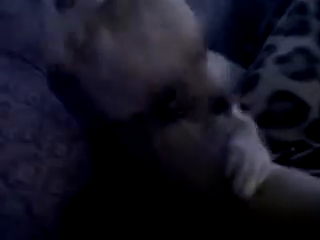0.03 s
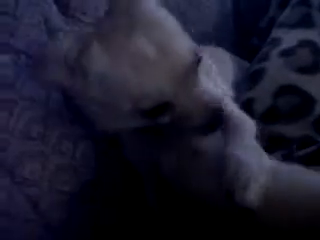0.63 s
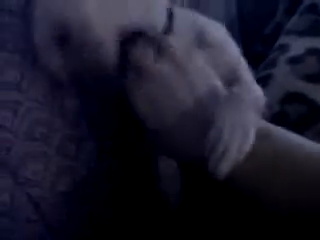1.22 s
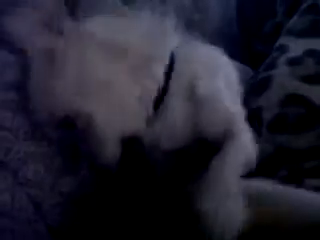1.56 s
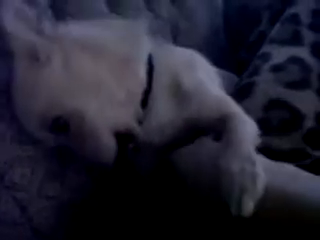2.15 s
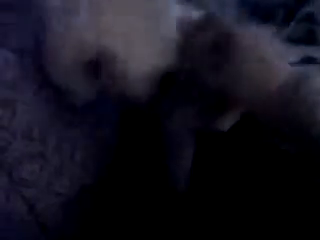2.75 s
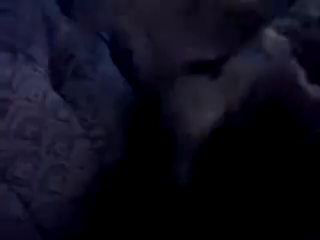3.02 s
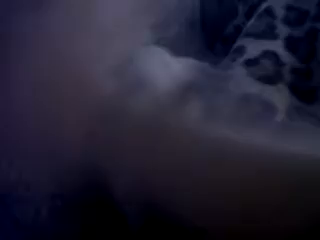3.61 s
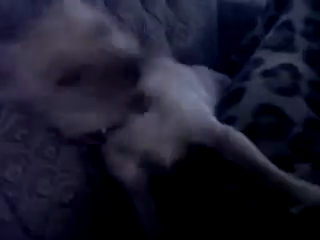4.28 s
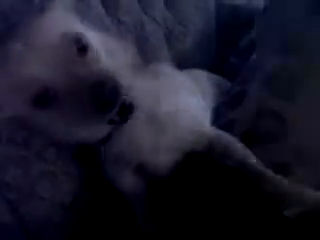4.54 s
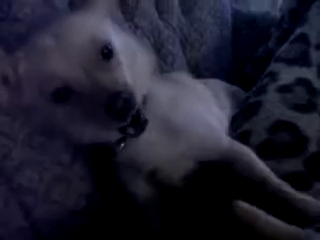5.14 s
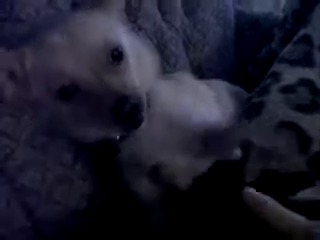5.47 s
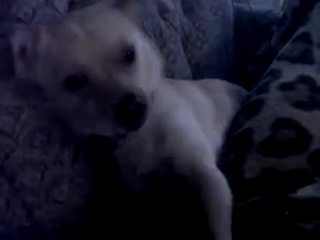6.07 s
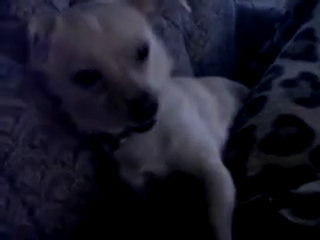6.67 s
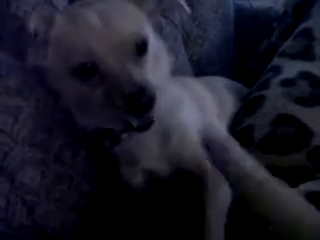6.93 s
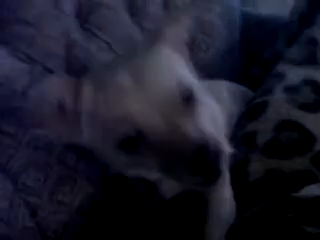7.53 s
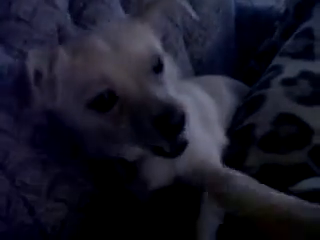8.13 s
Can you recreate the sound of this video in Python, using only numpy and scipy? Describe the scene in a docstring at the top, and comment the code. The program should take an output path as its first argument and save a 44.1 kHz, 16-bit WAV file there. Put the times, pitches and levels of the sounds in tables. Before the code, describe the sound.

A small puppy play-growls close to the microphone in a quiet, softly furnished room. A low growl is followed by a snarl that smooths into a moan, then a snort and a few soft grunts. More rough growls come in bursts, with quick gasps, lip smacks and a faint cloth rustle between them. Near the end, a slow rattle of grunts leads into the loudest snarl, and the cushions rustle faintly.

```python
"""A small puppy play-growls on a sofa, close to the microphone, in a quiet, softly furnished room.
It starts with a low growl: its vocal folds flap, and the pulses hum through the throat and, as the lips
part, blare from the mouth. Near 1 s a snarl smooths into a moan, then come a snort and a few grunts.
More growls follow from 2.5 s, with gasps, lip smacks and a rustle between them. Near 7 s a slow rattle
of grunts leads into the loudest snarl. Last, the puppy snatches air and shifts on the cushions."""
import sys
import numpy as np
from scipy import signal
from scipy.io import wavfile
from scipy.ndimage import uniform_filter1d

SR = 44100
rng = np.random.default_rng(int(sys.argv[2]) if len(sys.argv) > 2 else 0)


def int16_out(signal):
    """Quantize to a 16-bit WAV file."""
    q = np.round(np.clip(np.atleast_2d(signal).T, -1, 1) * 32767)
    wavfile.write(sys.argv[1], SR, q.astype(np.int16))


N = 369999

# hard slaps of the vocal folds at the height of a snarl: (time [s], peak [dB])
FOLD_SLAPS = [(.965, -19), (1.011, -16.5), (1.049, -17), (1.057, -16.5), (7.362, -14), (7.408, -7.7),
              (7.446, -5.7), (7.453, -6.5), (7.459, -7.5), (7.484, -4.8), (7.499, -8), (7.551, -10)]
# tone of the narrow throat: (frequency [Hz], level [dB])
NARROW_THROAT = [(40, -47), (75, -24.5), (102, -10), (145, -1), (180, -1.5), (230, 4), (300, -2.5),
                 (400, -6.3), (520, -5.3), (620, -13), (740, -26.5), (1100, -46), (2500, -78.5)]


def gain_of(db):
    """Turns decibels into a factor to multiply by."""
    return 10 ** (np.asarray(db) / 20)


def evened(x):
    """Scales the average strength (rms) to 1."""
    return x / np.sqrt(np.mean(x ** 2) + 1e-20)


def peaked(x):
    """Scales the highest peak to 1."""
    return x / (abs(x).max() + 1e-20)


def steadied(x, size=2600):
    """Holds the running strength near 1, leaving single pulses uneven."""
    window = np.hanning(size)
    weight = signal.fftconvolve(np.ones(len(x)), window, "same")
    power = signal.fftconvolve(x ** 2, window, "same") / weight
    return x / np.sqrt(abs(power) + 1e-4 * np.mean(x ** 2))


def wobble(count, size, mode="reflect"):
    """A random curve, smoothed over size samples."""
    return evened(uniform_filter1d(rng.standard_normal(count), size=size, mode=mode))


def read(points, hz):
    """Looks up a table at the frequencies hz, on a log scale."""
    f, value = np.transpose(points)
    return np.interp(np.log(hz + 1), np.log(f), value)


def follow(rows, t):
    """Looks up every column of a table at the times t."""
    s, *columns = np.transpose(rows)
    return [np.interp(t, s, c) for c in columns]


def add(mix, s, sound):
    """Mixes a sound in at s seconds."""
    part = mix[max(round(s * SR), 0):][:len(sound)]
    part += sound[:len(part)]


def swell(rise, hold, db, fade_db_per_s):
    """Loudness of a puff or a rub: it rises, holds and dies away by 40 dB."""
    t = np.arange(0, rise + hold + 40 / fade_db_per_s, 1 / SR)
    return np.minimum(t / rise, 1) * gain_of(db - fade_db_per_s * np.maximum(t - rise - hold, 0))


def colour(x, tone, size=4096):
    """Filters a sound to the given tone; each pulse rings after it strikes."""
    log_gain = np.log(gain_of(read(tone, abs(np.fft.fftfreq(size, 1 / SR)))))
    ring = np.fft.ifft(np.exp(np.conj(signal.hilbert(log_gain)))).real
    return signal.fftconvolve(x, ring[:size // 2])[:len(x)]


def cavity(x, hz, modes, order=3):
    """A hollow space rings at a few frequencies (its modes), which move together with hz."""
    out, turns = np.zeros(len(x)), np.cumsum(hz * np.ones(len(x))) / SR
    for k, (multiple, width, db) in enumerate(modes):
        turn = np.exp(2j * np.pi * multiple * turns)
        decay = np.exp(-np.pi * width / SR)
        ring = signal.lfilter([(1 - decay) ** order], np.poly([decay] * order), x / turn)
        out += (-1) ** k * gain_of(db) * (turn * ring).real
    return out


def grainy_hiss(events, tone, grain_db, fade_db_per_s):
    """Short bursts of hiss whose level flickers."""
    out = np.zeros(N)
    for s, rise, hold, db in events:
        level = swell(rise, hold, db, fade_db_per_s)
        hiss = rng.standard_normal(len(level)) * gain_of(grain_db * wobble(len(level), 150))
        add(out, s, level * evened(colour(hiss, tone)))
    return out


def still_air():
    """The faint, steady hush of the room."""
    # tone of the hush: (frequency [Hz], level [dB])
    hush = [(25, -9.5), (130, -5), (220, -9.5), (480, -11), (780, -7.5), (1000, -13.5), (1700, -19),
            (3000, -24.5), (4200, -29.5), (6000, -36), (8000, -43.5)]
    return gain_of(-66.5) * evened(colour(rng.standard_normal(N), hush))


def room_echo(x, size=22050):
    """Sound bounces off walls and furniture; the highest tones die first."""
    # how long the room rings: (frequency [Hz], time to fade by 60 dB [s])
    ring_times = [(100, 0.25), (500, 0.18), (1500, 0.23), (6000, 0.067)]
    bounces = rng.standard_normal(size) * (rng.random(size) < 2500 / SR) * (np.arange(size) / SR > .005)
    hz, t, bands = signal.stft(bounces, SR, nperseg=256)
    fade = gain_of(-60 * t / read(ring_times, hz)[:, None])
    tail = signal.istft(bands * fade, SR, nperseg=256)[1]
    return signal.fftconvolve(x, tail / np.linalg.norm(tail))[:N]


def cushions():
    """Cloth catches and slips under the puppy."""
    # rustles: (time [s], rise [s], hold [s], level [dB])
    rustles = [(1.68, .03, .03, -63), (4.74, .09, .08, -63), (8.212, .008, .008, -51), (8.28, .04, .1, -61)]
    # tone of the cloth: (frequency [Hz], level [dB])
    cloth = [(60, -29), (150, -3.5), (330, 9), (900, 12.5), (1500, 3), (2600, -4), (4000, -22.5),
             (7000, -35)]
    return grainy_hiss(rustles, cloth, grain_db=1, fade_db_per_s=90)


def snort():
    """Air sputters through the nostrils."""
    # one puff: (time [s], rise [s], hold [s], level before the boost [dB])
    puff = (1.535, .03, .07, -57)
    # tone of the nostrils: (frequency [Hz], level [dB])
    nostrils = [(600, -4), (1000, 10), (1450, -3.5), (1900, 4), (2300, -20), (2750, -0.5), (3200, -23),
                (3900, 7), (4400, -12.5), (4800, -12), (5400, -27), (7000, -47)]
    return gain_of(6) * grainy_hiss([puff], nostrils, grain_db=2, fade_db_per_s=150)


def gasps(flutter_db=1.5, boost_db=.5):
    """Air is drawn in through the narrow muzzle and flutters over wet tissue."""
    # quick breaths: (time [s], rise [s], hold [s], level before the boost [dB], ring [Hz])
    breaths = [(.67, .05, .005, -49, 1500), (3.103, .03, .07, -42.5, 1325),
               (3.424, .014, .008, -44.5, 1410), (3.615, .018, .002, -54, 1430),
               (4.33, .03, .003, -46.5, 1545), (6.434, .016, .006, -50, 1330),
               (7.745, .013, .003, -53, 1290)]
    # modes of the nose: (multiple of the ring frequency, width [Hz], level [dB])
    nose = [(.5, 500, -13.5), (.86, 407, -2.5), (1.0, 412, 1.5), (1.17, 408, -1.5), (2.05, 680, -24.5),
            (2.45, 700, -25)]
    out = np.zeros(N)
    for s, rise, hold, db, hz in breaths:
        level = swell(rise, hold, db + boost_db, fade_db_per_s=370)
        air = rng.standard_normal(len(level)) * gain_of(flutter_db * wobble(len(level), 200))
        add(out, s, level * steadied(cavity(air, hz, nose)))
    return out


def smacks(fade_s=.0048):
    """Lips part with a tick, a short wet fizz and a faint, bright snap of the teeth."""
    # smacks: (time [s], peak [dB], ring [Hz], fizz against the tick [factor], snap [dB])
    partings = [(1.5395, -37, 974, .6, -28), (2.583, -52, 1700, .2, -16), (3.102, -36, 1130, .4, -28),
                (3.4379, -40, 1340, .3, -28), (3.628, -49, 1450, .15, -26), (3.725, -58, 1250, .6, -28),
                (4.317, -49, 1700, .1, -35), (4.3425, -29.5, 1680, .02, -36), (6.3525, -36, 1250, .08, -23),
                (6.362, -28, 1350, .06, -21), (6.37, -42, 1500, .08, -22), (6.4345, -33, 1250, .02, -25)]
    # modes of the lips and of the snap: (multiple of the ring frequency, width [Hz], level [dB])
    lips = [(0.598, 870, -9), (1.0, 620, 0), (1.25, 900, -7)]
    snap = [(1.9, 2600, 0)]
    out, t = np.zeros(N), np.arange(2048) / SR
    for s, db, hz, wet, snap_db in partings:
        tick = signal.unit_impulse(len(t)) + wet * np.exp(-t / fade_s) * rng.standard_normal(len(t))
        smack = cavity(tick, hz, lips) + gain_of(snap_db) * cavity(tick, hz, snap)
        add(out, s, gain_of(db) * peaked(smack))
    return out


def puffs(pulses, fade_s, leak):
    """Air hisses through the vocal folds after each flap, and leaks a little between."""
    gate = evened(signal.lfilter([1], [1, -np.exp(-1 / (fade_s * SR))], pulses))
    return evened((gate + leak) * rng.standard_normal(len(pulses)))


def grunts(gap_s=.012, air=.7):
    """The vocal folds flap once or twice and stall."""
    # grunts: (time [s], peak [dB], mouth against throat [dB], strength of a second flap [0-1])
    events = [(.843, -30.5, 1.5, 0), (2.228, -52, -28, 0), (2.287, -49.5, -37, 0.2), (2.336, -48, -35, .7),
              (2.392, -48.5, -27.5, 0.1), (2.473, -34, -40, 0), (2.507, -36.5, -27.5, 0),
              (6.366, -33, -14, 0.15), (6.895, -31, -6.5, 0), (6.937, -27, -7.5, 0.46),
              (6.98, -27.5, -7.5, 0.75), (7.025, -29, -5, 0.57), (7.069, -29, -4, 1)]
    # tone of the half-open muzzle: (frequency [Hz], level [dB])
    half_open = [(300, -26), (600, -9), (820, -18), (1100, 1), (1400, -9), (1750, -10), (2150, -26),
                 (2600, -20), (3050, -29), (3550, -24), (4200, -38), (5000, -52), (7000, -64)]
    out, flap = np.zeros(N), signal.unit_impulse(2048)
    throat = peaked(colour(flap, NARROW_THROAT))
    for s, db, mouth_db, second in events:
        mouth = peaked(colour(evened(flap) + air * puffs(flap, fade_s=.004, leak=.01), half_open))
        grunt = gain_of(db) * peaked(throat + gain_of(mouth_db) * mouth)
        add(out, s, grunt)
        add(out, s + gap_s, second * grunt)
    return out


def slaps():
    """The vocal folds slam shut and make the wide-open mouth ring."""
    # tone of the wide-open mouth: (frequency [Hz], level [dB])
    wide_open = [(300, -38), (600, -19), (780, -26), (980, -2), (1250, 0), (1600, -4), (2000, -30),
                 (2600, -48), (6000, -65)]
    out, ring = np.zeros(N), peaked(colour(signal.unit_impulse(1024), wide_open))
    for s, db in FOLD_SLAPS:
        add(out, s, gain_of(db) * ring)
    return out


def pitch_and_roughness(t, easy_hz, easy_rough, effort_db, mouth_db, smooth_at):
    """Effort and a wide mouth make the voice higher and rougher; moans follow their own path."""
    # one list for each moan, rattle or yell: (time [s], pitch [Hz], roughness [0-1])
    moans = [
        [(1.145, 205, .25), (1.165, 200, .04), (1.24, 170, .03), (1.29, 206, .06), (1.345, 162, .03),
         (1.425, 132, .05), (1.437, 182, .2), (1.49, 153, .1), (1.52, 165, .15), (1.545, 155, .15)],
        [(2.54, 135, .55), (2.68, 138, .55), (2.7, 215, .5), (2.765, 226, .24), (2.81, 219, .24),
         (2.845, 220, .6), (2.868, 246, .3), (2.915, 245, .11), (2.95, 236, .03), (3.02, 212, .05),
         (3.07, 135, .1)],
        [(5.19, 255, .1), (5.24, 177, .1), (5.3, 160, .05)],
        [(5.865, 222, .6), (5.93, 230, .45), (5.945, 176, .32), (6.0, 156, .28), (6.02, 114, .42),
         (6.12, 106, .42), (6.2, 99, .2), (6.29, 93, .17), (6.36, 68, .35)],
        [(7.1, 108, .5), (7.195, 112, .6), (7.21, 240, .5), (7.32, 242, .6), (7.34, 140, .65), (7.46, 152, .36),
         (7.53, 140, .2), (7.59, 124, .22), (7.64, 130, .45), (7.735, 105, .4)],
    ]
    push_db, wide_db = effort_db + 40, mouth_db + 50  # both 0 in an easy growl, lips just apart
    waver = 1 + .036 * wobble(len(t), 3000, mode="wrap")
    droop = 1 - .18 * np.exp((t - t[-1]) / .06)  # the breath runs out
    hz = easy_hz * 2 ** (.022 * push_db + .006 * wide_db) * waver * droop
    smoothed = (1 + np.tanh((t - smooth_at) / .065)) / 2
    rough = (easy_rough + .02 * push_db + .009 * wide_db) * (1 - .35 * smoothed)
    rough = np.clip(rough, .1, .85)
    for moan in moans:
        moaning = (t >= moan[0][0]) & (t <= moan[-1][0])
        hz, rough = np.where(moaning, follow(moan, t), (hz, rough))
    return uniform_filter1d([hz, np.clip(rough, 0, 1)], size=400)  # the folds take a moment to change


def flaps(hz, rough, jitter=.21, shimmer_db=4, drift=.14, limp=.75, limp_hz=190):
    """One pulse each time the vocal folds close: the rougher, the more uneven in timing and force."""
    turns = np.cumsum(hz * (1 + drift * rough * wobble(len(hz), 700))) / SR
    at = np.flatnonzero(np.diff(np.floor(turns + .8)) > 0)
    late, force = np.clip(rng.standard_normal((len(at), 2)), -2, 1.5).T
    # tight, strained folds limp: strong and weak flaps take turns
    alternate = limp * (hz[at] > limp_hz) * (-1.) ** np.arange(len(at))
    delay = (late + alternate) * jitter * rough[at] ** 2 * SR / hz[at]
    closes_at = np.clip(at + delay, 0, len(hz) - 1).astype(int)
    pulses = np.zeros(len(hz))
    pulses[closes_at] = gain_of(shimmer_db * rough[at] * (force + alternate / 2))
    return pulses


def rasp(pulses, cheek_hz, cheek_db, teeth_hz, teeth_db):
    """Pulses and rushing air buzz at the cheeks and teeth."""
    # modes of cheeks and teeth: (multiple of the ring frequency, width [Hz], level [dB])
    cheek_modes = [(.88, 1000, -4), (1.01, 680, 0)]
    teeth_modes = [(1.0, 760, 0), (1.25, 700, -18)]
    # tone of the rushing air: (frequency [Hz], level [dB])
    rush_tone = [(500, -20), (1500, 0), (2100, 0), (2800, -6), (3500, -12), (4300, -20), (5200, -32),
                 (7000, -42)]
    buzz = evened(pulses) + 1.5 * puffs(pulses, fade_s=.003, leak=.15)
    cheeks = gain_of(cheek_db) * steadied(cavity(buzz, cheek_hz, cheek_modes))
    teeth = gain_of(teeth_db) * steadied(cavity(buzz, teeth_hz, teeth_modes))
    rush = evened(colour(puffs(pulses, fade_s=.003, leak=.2), rush_tone))
    return cheeks + teeth + gain_of(-4 + (cheek_db + teeth_db) / 4) * rush


def muzzle_ring(blare, t):
    """The voice rings one clear note in the taut muzzle; it slides down as the jaw closes."""
    # one list for each note: (time [s], ring [Hz], level [dB])
    notes = [
        [(2.7, 1080, -48), (2.77, 1100, -38), (2.86, 1090, -41), (2.9, 1080, -46)],
        [(5.88, 1600, -50), (5.915, 1540, -42), (5.945, 1410, -37.5), (5.965, 1330, -44), (5.99, 1230, -39.5),
         (6.005, 1200, -50)],
        [(7.11, 1100, -48), (7.168, 1100, -42), (7.176, 1140, -27), (7.195, 1120, -38), (7.22, 1150, -32),
         (7.28, 1220, -39), (7.41, 1160, -27), (7.48, 1090, -23), (7.535, 1120, -22), (7.57, 1000, -28),
         (7.615, 840, -35), (7.67, 740, -44)],
    ]
    # the one narrow mode: (multiple of the ring frequency, width [Hz], level [dB])
    taut_mode = [(1.0, 110, 0)]
    out = np.zeros(len(t))
    for note in notes:
        held = (t >= note[0][0]) & (t <= note[-1][0])
        if held.any():
            hz, db = follow(note, t)
            level = uniform_filter1d(held * gain_of(db), size=200)
            out += level * steadied(cavity(blare, hz, taut_mode, order=2))
    return out


def mouth_blare(blare, mouth_hz, snarl_hz, snarl_db):
    """The voice rings the mouth; lips drawn back add a higher, snarling ring."""
    # modes of mouth and snarl: (multiple of the ring frequency, width [Hz], level [dB])
    mouth_modes = [(.92, 400, 3), (1.08, 390, 1)]
    snarl_modes = [(.89, 400, -2), (1.01, 400, 0)]
    mouth = steadied(cavity(blare, mouth_hz, mouth_modes, order=4))
    return mouth + gain_of(snarl_db) * steadied(cavity(blare, snarl_hz, snarl_modes, order=4))


def throat_hum(hum, hz, mouth_db):
    """The voice hums in the throat. A wide mouth or a strained pitch opens it and thins the bass."""
    # tone of the open throat: (frequency [Hz], level [dB])
    open_throat = [(40, -57.5), (85, -33.5), (115, -6.5), (145, 3), (190, -3.5), (245, 7.5), (320, -3),
                   (400, -4.5), (500, -1.5), (665, -3), (810, -17.5), (1100, -24.5), (2500, -69.5)]
    strain = np.maximum(hz - 145, 0) / 50
    opening = np.clip((mouth_db + 47) / 21 + strain, 0, 1)
    return steadied((1 - opening) * colour(hum, NARROW_THROAT) + opening * colour(hum, open_throat))


def growls(throb_hz=22.5, catch_s=.009, slap_s=.004):
    """The same pulses sound three ways: a hum in the throat, a blare from the mouth and a rasp."""
    # one row a growl: (time it smooths [s], easy pitch [Hz], easy roughness [0-1], full throb [dB])
    voices = [(.19, 109, .28, 3), (1.25, 102, .17, 1.5), (1.44, 113, .2, 3), (2.99, 126, .26, 4),
              (3.39, 118, .45, 4), (3.97, 112, .24, 3), (4.13, 117, .25, 3), (4.62, 113, .56, 2.5),
              (5.27, 106, .1, 0), (5.86, 111, .52, 2.2), (6.0, 108, .27, 1.2), (7.47, 115, .28, 3)]
    # push and mouth opening, one list a growl: (time [s], effort [dB], open-mouth level [dB])
    pushes = [
        [(0.0, -34, -40), (0.018, -35, -36), (0.084, -39, -45), (0.126, -34, -37), (0.168, -35, -49),
         (0.318, -40, -62), (0.436, -39, -58), (0.49, -55, -84)],
        [(0.855, -40, -46), (0.863, -36, -37), (0.877, -34, -40), (1.047, -33, -29), (1.239, -40, -46),
         (1.265, -43, -41), (1.29, -50, -53)],
        [(1.29, -51, -51), (1.35, -46, -51), (1.388, -40, -42), (1.43, -38, -46), (1.454, -37, -53),
         (1.648, -39, -55), (1.7, -57, -61)],
        [(2.54, -44, -73), (2.598, -41, -59), (2.608, -45, -76), (2.628, -37, -54), (2.736, -32, -35),
         (2.79, -32, -38), (2.906, -28, -29.5), (3.028, -32, -39), (3.07, -51, -66)],
        [(3.325, -46, -68), (3.341, -41, -52), (3.369, -42, -50), (3.405, -52, -72)],
        [(3.715, -51, -75), (3.733, -44, -65), (3.771, -44, -79), (3.843, -40, -53), (3.971, -41, -61),
         (4.12, -45, -65)],
        [(4.115, -45, -64), (4.173, -41, -60), (4.271, -39, -65), (4.31, -51, -74)],
        [(4.45, -49, -78), (4.502, -37, -53), (4.642, -38, -66), (4.65, -37, -57), (4.724, -46, -69),
         (4.75, -61, -72)],
        [(5.18, -64, -87), (5.204, -52, -89), (5.284, -56, -84), (5.3, -67, -85)],
        [(5.33, -55, -89), (5.354, -48, -76), (5.466, -38, -54), (5.57, -34.5, -52), (5.625, -38, -58),
         (5.71, -36, -49), (5.76, -37, -53), (5.792, -33, -50), (5.804, -35, -56), (5.838, -30.5, -43),
         (5.86, -37, -51)],
        [(5.86, -37, -48), (5.866, -36, -48), (5.912, -30.5, -38), (5.966, -39, -47), (6.0, -37, -41),
         (6.025, -35, -48), (6.22, -43, -63), (6.318, -42, -65), (6.362, -46, -57)],
        [(7.108, -38, -48), (7.132, -34, -42), (7.266, -29, -33), (7.278, -36, -40), (7.324, -29, -28),
         (7.478, -28.5, -20.5), (7.56, -27, -22.5), (7.622, -28, -36), (7.704, -32, -38), (7.735, -49, -59)],
    ]
    # how jaw and lips move the rings, one list a growl: (time [s], mouth [Hz], snarl [Hz],
    # snarl against mouth [dB], cheek [Hz], cheek rasp [dB], teeth [Hz], teeth rasp [dB])
    muzzles = [
        [(.06, 1280, 1760, -4, 2350, 3, 2850, -3), (.14, 1280, 1720, -5, 2600, 1, 3500, -4),
         (.3, 1120, 1450, -6, 2600, -2, 3450, -10)],
        [(.87, 1180, 1760, -9, 2400, -1, 3600, 0), (.97, 1230, 1830, -8, 2350, 3, 3500, 2),
         (1.06, 1260, 1860, -7, 2500, 3, 3280, -2), (1.12, 1250, 1760, -9, 2550, -2, 2950, -3),
         (1.2, 1120, 1680, -12, 2350, -9, 3000, -18), (1.28, 1170, 1820, -8, 2400, -9, 3200, -20)],
        [(1.3, 1200, 1450, -8, 2400, -9, 3300, -18), (1.4, 1170, 1360, -8, 2400, -12, 3300, -19),
         (1.5, 1080, 1300, -6, 2600, -4, 3500, -14)],
        [(2.66, 1120, 1800, -9, 2400, 1, 3450, -9), (2.77, 1220, 1650, -14, 2350, 0, 3450, -13),
         (2.88, 1110, 1450, -15, 2400, -2, 3700, -11), (2.96, 1130, 1350, -16, 2450, -8, 3700, -8),
         (3.04, 1020, 1220, -12, 2300, -9, 3550, -12)],
        [(3.35, 1130, 1450, -7, 2500, -6, 3500, -10)],
        [(3.86, 1250, 1650, -5, 2500, -3, 3300, -10), (4.0, 1100, 1520, -6, 2750, 4, 3500, -12)],
        [(4.15, 1050, 1480, -8, 2750, 2, 3500, -12)],
        [(4.52, 1230, 1780, -4, 2700, -2, 3450, -8), (4.66, 1050, 1400, -10, 2500, -6, 3450, -12)],
        [(5.25, 1000, 1400, -10, 2400, -10, 3300, -14)],
        [(5.57, 1080, 1430, -5, 2450, 8, 3200, -8), (5.72, 1030, 1450, -6, 2900, -1, 3400, -14),
         (5.84, 1080, 1480, -3, 2650, -4, 3300, -19)],
        [(5.87, 1130, 1560, -6, 2480, 4, 3350, 8), (5.92, 1170, 1500, -8, 2550, 1, 3550, 3),
         (5.95, 1150, 1390, -6, 2650, -2, 3550, -8), (6.0, 1060, 1250, -5, 2500, -5, 3500, -18),
         (6.1, 1080, 1300, -7, 2400, 0, 3500, -17)],
        [(7.15, 1150, 1750, -9, 2600, 0, 3550, 2), (7.25, 1180, 1720, -9, 2500, 10, 3250, 7),
         (7.315, 1200, 1700, -2, 2380, 16, 3000, 6), (7.36, 1170, 1680, -4, 2350, 8, 3550, 1),
         (7.42, 1220, 1600, -4, 2600, -3, 4000, -7), (7.48, 1170, 1490, -2, 3200, -9, 4700, -16),
         (7.55, 1120, 1430, -2, 3000, -9, 4950, -14), (7.62, 950, 1320, -3, 2600, -2, 5150, -17),
         (7.7, 1000, 1280, -6, 2550, -1, 5200, -26)],
    ]
    # the voice catches as the folds stall for a moment: (time [s], depth [dB])
    catches = [(.1, 7), (2.608, 16), (5.544, 8), (5.803, 9), (5.856, 6), (6.011, 20), (6.068, 7),
               (7.148, 9), (7.194, 13)]
    out = np.zeros(N)
    for (smooth_at, easy_hz, easy_rough, throb_db), push, muzzle in zip(voices, pushes, muzzles):
        t = np.arange(push[0][0], push[-1][0], 1 / SR)
        effort_db, mouth_db = follow(push, t)
        mouth_hz, snarl_hz, snarl_db, *cheeks_and_teeth = follow(muzzle, t)
        hz, rough = pitch_and_roughness(t, easy_hz, easy_rough, effort_db, mouth_db, smooth_at)
        pulses = flaps(hz, rough)
        air = rough * puffs(pulses, fade_s=.004, leak=.1)  # smooth moans carry almost no hiss
        hum, blare = evened(pulses) + air, evened(pulses) + 2.8 * air
        throat = gain_of(effort_db - .7) * throat_hum(hum, hz, mouth_db)
        mouth = gain_of(mouth_db - 1.4) * mouth_blare(blare, mouth_hz, snarl_hz, snarl_db)
        mouth += muzzle_ring(blare, t)
        # the mouth dips where a slap takes the place of an ordinary flap
        mouth *= gain_of(-10 * sum(np.exp(-((t - s) / slap_s) ** 2) for s, _ in FOLD_SLAPS))
        rasp_db = -40 + .6 * mouth_db  # grows as the mouth opens
        voice = throat + mouth + gain_of(rasp_db) * rasp(pulses, *cheeks_and_teeth)
        # loose tissue above the folds makes a rough growl throb
        throb = gain_of(-throb_db * rough * np.cos(2 * np.pi * throb_hz * (t - t[0])))
        stall = gain_of(-sum(db * np.exp(-((t - s) / catch_s) ** 2) for s, db in catches))
        soft_ends = np.clip(np.minimum(t - t[0], t[-1] - t) / .004, 0, 1)
        add(out, t[0], soft_ends * throb * stall * voice)
    return out


def scene():
    """The puppy and its cushions, the still air and a faint echo."""
    near = grunts() + slaps() + gasps() + smacks() + snort() + growls() + cushions()
    return (near + still_air() + gain_of(-18) * room_echo(near))[None]


def record(dry, ceiling=.5, hardness=20, cutoff_hz=8000):
    """The loudest peaks just touch the microphone's limit and crackle; the top treble is cut."""
    squeezed = dry / (1 + abs(dry / ceiling) ** hardness) ** (1 / hardness)
    low_pass = signal.firwin(255, cutoff_hz, window=("kaiser", 9), fs=SR)
    return signal.oaconvolve(squeezed, low_pass[None], "same")


dry = scene()
out = record(dry)
int16_out(out)
```